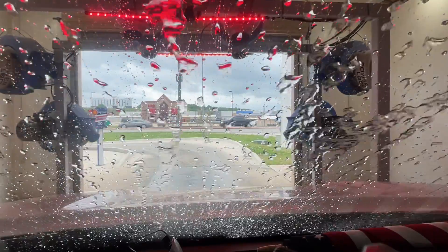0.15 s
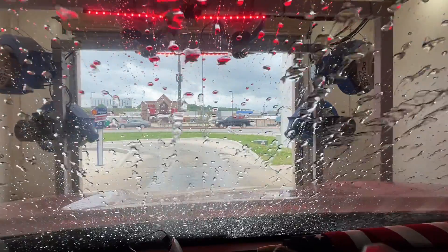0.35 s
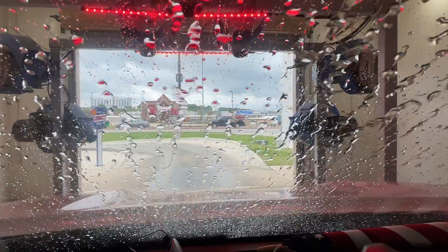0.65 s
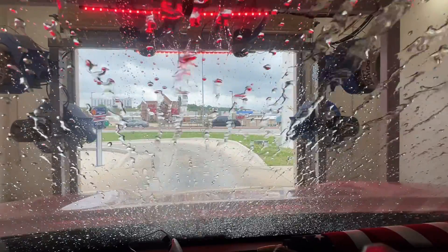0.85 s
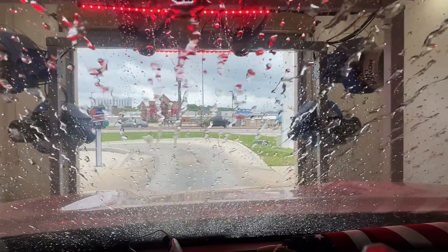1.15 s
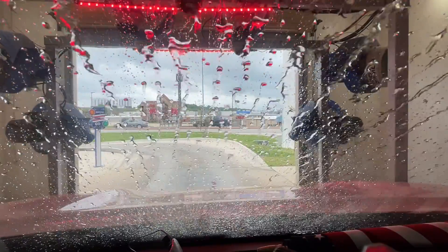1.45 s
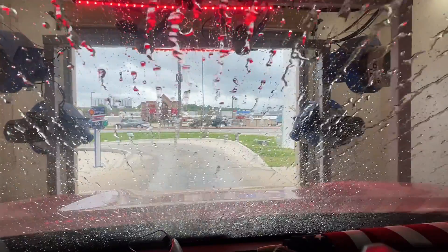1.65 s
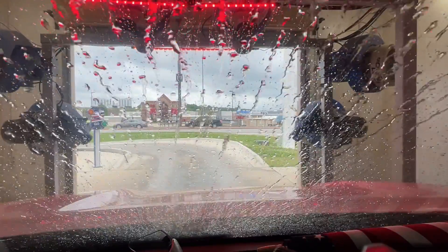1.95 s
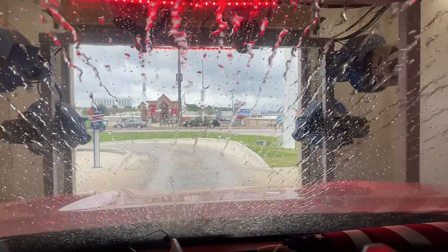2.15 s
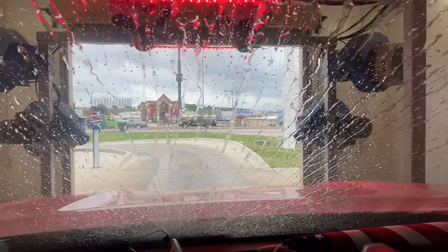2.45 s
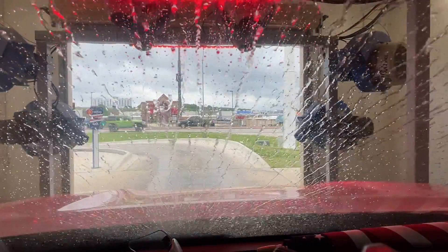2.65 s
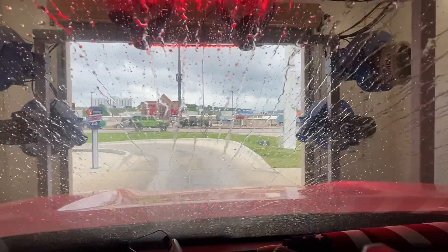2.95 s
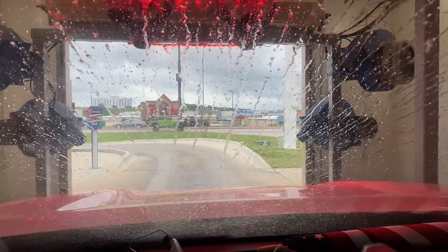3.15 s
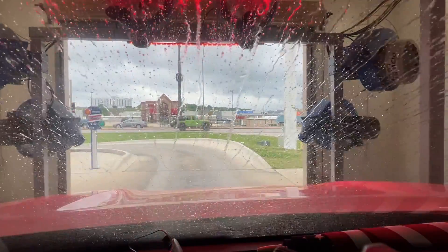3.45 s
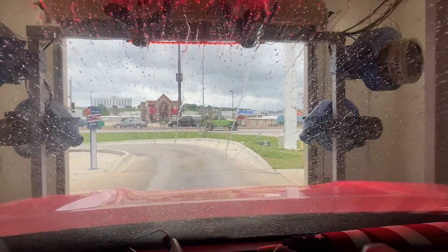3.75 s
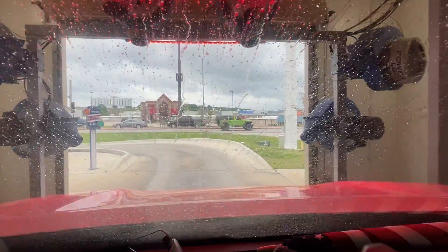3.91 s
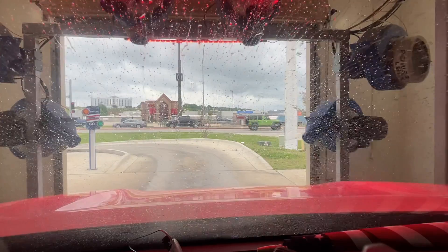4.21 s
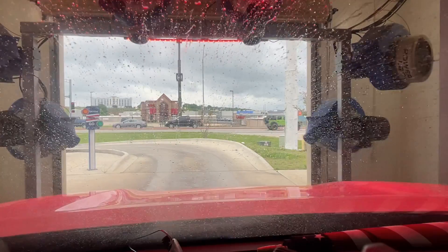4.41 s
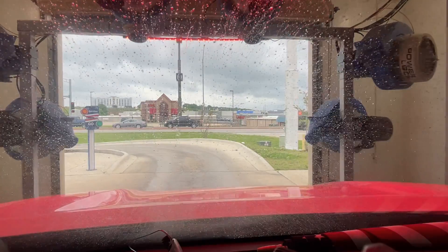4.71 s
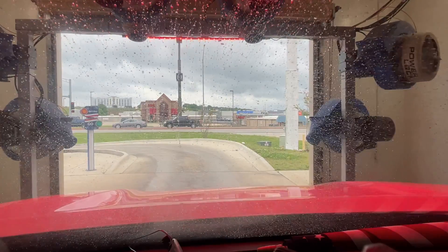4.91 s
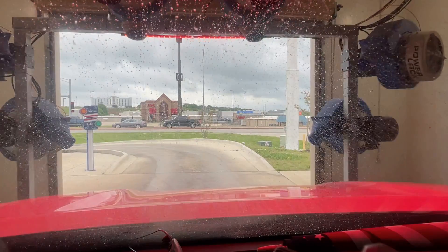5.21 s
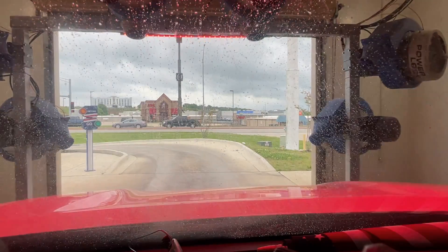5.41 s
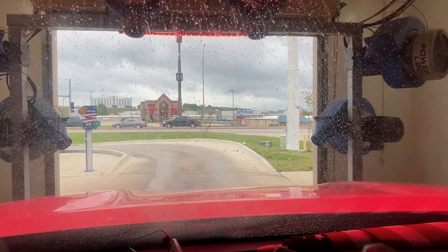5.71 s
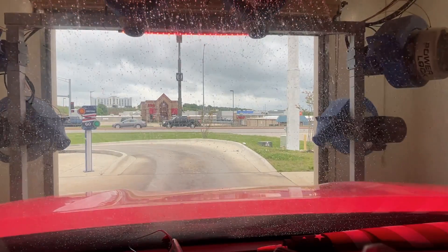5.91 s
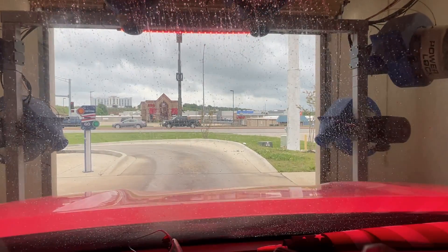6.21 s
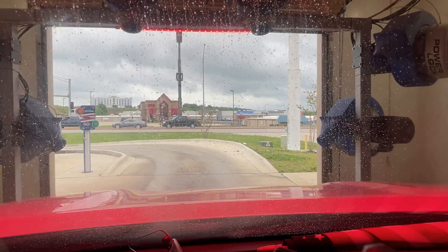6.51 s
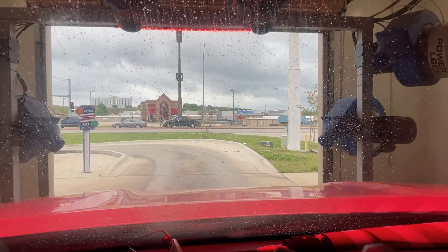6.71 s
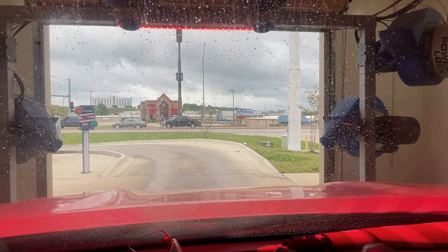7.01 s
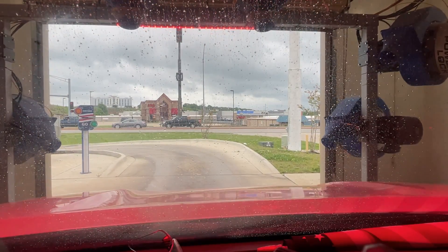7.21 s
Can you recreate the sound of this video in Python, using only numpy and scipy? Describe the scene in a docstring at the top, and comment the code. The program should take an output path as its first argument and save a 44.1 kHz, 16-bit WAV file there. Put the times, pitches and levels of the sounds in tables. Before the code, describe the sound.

From inside a truck cab, powerful blower jets boom and roar steadily, panels drumming, with water drops pattering on the windscreen and a heavy flurry midway.

```python
"""The deep boom of air jets on a truck's body, heard throughout from the cabin as it rolls through car-wash dryers.
Filtered noise makes the throb, drumming panels, roar and windscreen hiss; wavering sines make the fan whine.
Blown water patters as short noise bursts ringing the glass, with a heavy flurry as the last nozzles pass
overhead. Late on, a piece of plastic trim gives a tiny click."""
import sys
import numpy as np
from scipy import signal
from scipy.fft import rfft, irfft, next_fast_len
from scipy.io import wavfile
from scipy.ndimage import uniform_filter1d, minimum_filter1d, map_coordinates

SR = 44100
rng = np.random.default_rng(int(sys.argv[2]) if len(sys.argv) > 2 else 0)


def int16_out(signal):
    """Quantize to a 16-bit WAV file."""
    q = np.round(np.clip(np.atleast_2d(signal).T, -1, 1) * 32767)
    wavfile.write(sys.argv[1], SR, q.astype(np.int16))


N = 324576

# Strength of the air jets on the truck, greatest under the last nozzles: t/s, strength/dB
JET_STRENGTH = [(0, -5.5), (1.1, -3), (2.4, -0.1), (3.4, 0), (4.35, 3), (5.0, -0.5), (6.0, -1.3),
                (7.36, 0.85)]
# As the jets work back from bonnet to cab, some sounds gain or lose steadily about this time
MIDWAY_S = 3.9

# Cabin and panel resonances: f/Hz, width/Hz, lift/dB
CABIN_MODES = [(151, 13, 3.5), (188.5, 30, 8.5), (266, 31, 7.5), (379, 38, 1), (471, 70, 4), (527, 15, 6.5),
               (1050, 9, 3.5), (1215, 92, 6), (1418, 170, 4.5), (2550, 90, 0)]
# Likeness of the two ears of the stereo picture: f/Hz, likeness/0-1
EAR_LIKENESS = [(55, .98), (120, .8), (190, .76), (235, .1), (300, .15), (360, .72), (600, .25), (2000, .1),
                (8000, .2)]
# Balance of the air between the ears: f/Hz, left minus right/dB
EAR_BALANCE = [(75, -1.2), (112, 3.2), (170, 0), (203, -4.5), (250, 3.5), (375, 8), (470, 5), (1200, 2),
               (4000, 4.5), (6500, 0)]
LEFT_LEAD_S = .00043

# Colours of the air layers, each levelled later: f/Hz, relative level/dB
THROB_COLOUR = [(15, -33), (42, -16), (50, -2.5), (55, 5.5), (61, 2.5), (70, -22), (140, -85)]
BOOM_COLOUR = [(15, -32), (48, -19), (62, -7), (72, 0), (105, 0.5), (135, -2), (160, -14), (400, -85)]
LOWER_PANEL_COLOUR = [(80, -54), (135, -8.5), (170, -5), (203, 0.5), (222, -6.5), (250, -25), (500, -80)]
UPPER_PANEL_COLOUR = [(130, -67), (215, -3.5), (245, -1.5), (280, -3.5), (320, -14), (700, -74)]
ROAR_COLOUR = [(120, -52), (260, -6.5), (330, 1.5), (450, 0.5), (520, -4.5), (620, -7.5), (800, -21),
               (4000, -84)]
NOZZLE_COLOUR = [(250, -34), (480, -6.5), (610, 1), (740, 1), (880, -2.5), (1050, -13.5), (1400, -26.5),
                 (6000, -77.5)]
HISS_COLOUR = [(500, -22), (1100, 1.5), (1800, 0.45), (2800, 0.5), (4100, -8), (4800, -10.5), (5600, -16),
               (6800, -28), (8000, -34.5), (10000, -38.5), (12000, -44), (14000, -59.5)]
FIZZ_COLOUR = [(1500, -23.5), (3800, -5.5), (5400, 2), (6800, -2), (8000, -13), (10000, -16), (12000, -22),
               (13200, -41)]

# Slow surges of the cabin's lowest air mode: t/s, half-length/s, lift/dB
SURGES = [(1.25, 0.6, 6.5), (2.5, .1, 3.5), (3.45, 0.7, 4), (5.35, 0.65, 6.5), (6.55, 0.17, 7.5),
          (7.1, 0.24, 9)]
THROB_DB = -25.5  # between surges
# Buffeting hump, which shifts as the jet moves over the body: t/s, f/Hz, lift/dB
BUFFET_HUMP = [(0, 96, -0.5), (1.2, 64.2, 5.5), (2.2, 81.6, 11.5), (3.45, 74, 8), (4.0, 94.6, 8),
               (4.75, 88.5, 8), (5.101, 71, 7), (5.501, 107, 11.5), (5.8, 100, 13.5), (6.251, 107.8, 9),
               (7.36, 100, 5.5)]
# Buffeting, building until the jets reach the windscreen: t/s, level/dB
BUFFET_LEVEL = [(0, -20), (1.7, -17.5), (2.7, -16.5), (3.8, -12.5), (5.0, -15.5), (7.36, -15.5)]
# Flapping of the jets, heard as regular gusts in the lows: t/s, half-length/s, depth/dB
FLAPPING = [(5.9, 1.3, 0.5)]
FLAP_CREST_S, FLAP_PERIOD_S = 5.49, .362

# Jets crossing the lower panel and setting it drumming: t/s, half-length/s, lift/dB
LOWER_PASSES = [(1.15, 0.19, 3.5), (1.95, 0.24, 6), (2.35, 0.12, 5), (2.85, .2, 3), (3.3, 0.051, 5),
                (3.97, .13, 6), (4.27, 0.099, 5), (4.59, .1, 9), (6.5, 0.13, 3), (7.15, .15, 5)]
# Jets crossing the higher panel: t/s, half-length/s, lift/dB
UPPER_PASSES = [(.72, 0.045, 5.5), (1.75, 0.27, 4), (2.3, 0.11, 5.5), (3.55, 0.092, 4), (4.25, 0.55, 3)]
LOWER_DB, UPPER_DB = -23, -26.5  # between passes

# Gusts as a jet strikes the cab squarely, and a lull between jets: t/s, half-length/s, lift/dB
GUSTS = [(4.03, .14, 0.5), (4.42, 0.11, 4.5), (5.5, 0.41, -0.9), (6.75, 0.22, 2)]
# A nozzle passing close by: t/s, half-length/s, lift/dB
NOZZLE_PASSES = [(2.55, 0.75, 2)]
# Jets sweeping the windscreen, raising the bright hiss: t/s, half-length/s, lift/dB
SWEEPS = [(2.6, 0.5, 1), (5.15, 0.4, 0.8)]
# Levels before passes and gusts, at jet strength 0 dB and mid-way; growth is dB per dB of jet strength
ROAR_DB, ROAR_GROWS, ROAR_DB_PER_S = -24.5, 0.56, 0.38
NOZZLE_DB, NOZZLE_GROWS, NOZZLE_DB_PER_S = -29.5, 1.12, -0.28
HISS_DB, HISS_GROWS = -37.5, 1.1
FIZZ_DB, FIZZ_DB_PER_S = -59.5, 1
ECHO_S, ECHO_GAIN = .018, .09  # latest echo inside the cab; strength of each

# Fan blade tones: f/Hz, left minus right/dB, distant level/dB, nearest t/s, lift when nearest/dB
FANS = [(583, 10, -41, 3.9, 10.5), (715.5, 4, -47, 3.75, 6.5), (717, 4, -50, 6.9, 13),
        (462, 5, -43, 6.7, 9)]
APPROACH_S, RECEDE_S = 0.42, 0.67  # a fan comes into earshot faster than it leaves
WHINE_GROWS = 0.76  # dB per dB of jet strength

# Heaviest drops slapping the windscreen, before panning: t/s, peak level/dB
DROPS = [(0.0176, -23), (0.082, -30), (0.1131, -30.5), (.1456, -29.5), (0.159, -27), (.175, -27),
         (0.2215, -27.5), (0.273, -29.5), (0.52, -28), (1.033, -29), (1.3008, -26.5), (4.0, -22),
         (4.016, -23.5), (4.1509, -17.5), (4.165, -19.5), (4.2104, -21.5), (4.249, -18), (4.26, -21),
         (4.2825, -22.5), (4.3577, -23), (4.382, -20.5), (4.3968, -17), (4.4148, -20), (4.4428, -20.5),
         (4.459, -23), (4.4765, -19.5), (4.5002, -19.5), (4.514, -23), (4.692, -20.5), (4.7335, -24),
         (4.793, -23.5), (7.19, -23)]
# Small hard drops ticking on the roof, before panning: t/s, peak level/dB
TICKS = [(3.1214, -24), (3.2266, -20), (3.243, -22), (3.39, -25), (3.4877, -25), (3.949, -25.5),
         (4.0318, -23.5), (4.044, -23), (4.8058, -27)]
# Colour of the spreading water's ring on the glass: f/Hz, relative level/dB
SPLAT_COLOUR = [(500, -30.5), (1450, -1), (1950, 8.5), (2850, 10), (3400, -2), (4300, -12), (5400, -6),
                (6500, -24.5), (8500, -30.5), (15500, -48)]
# Colour of a drop's first contact: f/Hz, relative level/dB
SNAP_COLOUR = [(800, -11.5), (2500, 6.5), (5500, 5), (8000, -19), (10300, -21.5), (11800, -7.5),
               (13000, -20), (15500, -22)]
# Colour of a small hard drop: f/Hz, relative level/dB
TICK_COLOUR = [(1000, -26.5), (2400, 2.5), (3100, 8.5), (3800, -1), (5200, -14.5), (12000, -55)]
# Water from the nozzles, slightly thinned at first, then a flurry: t/s, half-length/s, lift/dB
FLURRIES = [(.1, 0.38, -0.5), (4.4, .42, 4.5)]
SPRAY_DB, SPRAY_GROWS = -48, 0.52  # between flurries; dB per dB of jet strength
DROPLETS_PER_S, DROPLET_SCATTER_DB = 80, 6  # on each of four patches of glass
SPATTER_PER_S, SPATTER_DB = 50, 9.5  # middling drops at the flurry's height; their peak over the spray
SNAP_DB, SNAP_SCATTER_DB = -17, 3  # first contact against its ring; some land harder than others

# Colour of the trim click: f/Hz, relative level/dB
TRIM_COLOUR = [(3000, -15), (5800, 6), (8300, -15), (9800, 3.5), (11000, -19.5)]
TOP_HZ = 15800  # upper edge of the audible band


def amp(db):
    """Decibels to gain."""
    return 10 ** (np.asarray(db) / 20)


def unit(x):
    """Scale so that the average of the channels has rms 1."""
    return x / np.sqrt(np.mean(np.atleast_2d(x).mean(0) ** 2) + 1e-20)


def along(points, hz):
    """Read (Hz, value) points on a log-frequency axis."""
    f, v = np.transpose(points)
    return np.interp(np.log(hz + 1), np.log(f + 1), v)


def curve(rows):
    """Draw a (s, value) automation line, one value per sample."""
    s, value = np.transpose(rows)
    return np.interp(np.arange(N) / SR, s, value)


def swells(rows):
    """Sum bell-shaped changes (s, half-length s, lift dB), in dB per sample."""
    t = np.arange(N) / SR
    return sum(db * np.exp(-((t - s) / half) ** 2) for s, half, db in rows)


def travel():
    """Seconds before or after the jets are mid-way."""
    return np.arange(N) / SR - MIDWAY_S


def wobble(rate):
    """A smooth random curve with rate knots a second."""
    knots = rng.standard_normal(int(N * rate / SR) + 4)
    return map_coordinates(knots, [np.arange(N) * rate / SR])


def filtered(x, response):
    """Filter x by a complex response of frequency."""
    size = next_fast_len(N + 8192)
    return irfft(rfft(x, size) * response(np.fft.rfftfreq(size, 1 / SR)), size)[..., :N]


def pan(left_db):
    """Left and right gains for a left-minus-right balance in dB."""
    return amp(np.array([np.atleast_1d(left_db), -np.atleast_1d(left_db)]) / 2)


def add(track, s, sound):
    """Mix a sound into the track at time s."""
    part = track[:, round(s * SR):][:, :sound.shape[1]]
    part += sound[:, :part.shape[1]]


def cabin(hz):
    """Gain of the cabin's resonant peaks."""
    lifts = [db / (1 + (2 * (hz - centre) / width) ** 2) for centre, width, db in CABIN_MODES]
    return amp(sum(lifts))


def rush(spectrum, patchy_db):
    """Turbulent air in the cabin: stereo noise with drifting patches, reaching the left ear first."""
    z = signal.stft(rng.standard_normal((2, N)), nperseg=512)[2]
    field = uniform_filter1d(rng.standard_normal(z.shape[1:]), size=6, axis=0)
    field = uniform_filter1d(field, size=14, axis=1, mode="wrap")
    patchy = z * amp(patchy_db * field / field.std())
    pair = signal.istft(patchy, nperseg=512)[1][:, :N]

    def mid_side(hz):
        turn = np.arccos(np.clip(along(EAR_LIKENESS, hz), 0, 1)) / 2
        return amp(along(spectrum, hz)) * cabin(hz) * [np.cos(turn), np.sin(turn)]

    def ears(hz):
        lead = np.exp(1j * np.pi * LEFT_LEAD_S * np.outer([1, -1], hz))
        return pan(along(EAR_BALANCE, hz)) * lead

    mid, side = filtered(pair, mid_side)
    return unit(filtered(np.array([mid + side, mid - side]), ears))


def steadied(x, seconds):
    """Even out the slow swells of a noise, as under a constant jet."""
    power = np.abs(uniform_filter1d(x.mean(0) ** 2, size=max(int(seconds * SR), 2)))
    return unit(x / np.sqrt(power + .05))


def buffeting(octaves):
    """Low turbulence with a hump that follows the jet over the body."""
    hz, t, z = signal.stft(rush(BOOM_COLOUR, patchy_db=.5), SR, nperseg=4096)
    s, *columns = np.transpose(BUFFET_HUMP)
    centre_hz, lift_db = [np.interp(t, s, column) for column in columns]
    away = np.log2((hz[:, None] + 1) / centre_hz) / octaves
    return signal.istft(z * amp(lift_db * np.exp(-away ** 2)), SR, nperseg=4096)[1][:, :N]


def low_air():
    """Jets pump the cabin's lowest air mode and buffet the body; flapping makes both come in gusts."""
    t = np.arange(N) / SR
    flap = amp(swells(FLAPPING) * np.cos(2 * np.pi * (t - FLAP_CREST_S) / FLAP_PERIOD_S))
    throb = amp(THROB_DB + swells(SURGES)) * steadied(rush(THROB_COLOUR, patchy_db=0.5), seconds=0.19)
    boom = amp(curve(BUFFET_LEVEL)) * steadied(buffeting(octaves=0.11), seconds=0.18)
    return flap * (throb + boom)


def panels():
    """Two body panels drum in their own bands, louder as each jet crosses them."""
    lower = steadied(rush(LOWER_PANEL_COLOUR, patchy_db=0.44), seconds=0.18)
    upper = steadied(rush(UPPER_PANEL_COLOUR, patchy_db=1.0), seconds=0.2)
    return amp(LOWER_DB + swells(LOWER_PASSES)) * lower + amp(UPPER_DB + swells(UPPER_PASSES)) * upper


def roar():
    """Broad turbulent roar that grows with the jets and gusts as they strike the cab."""
    level_db = ROAR_DB + ROAR_GROWS * curve(JET_STRENGTH) + ROAR_DB_PER_S * travel() + swells(GUSTS)
    return amp(level_db) * steadied(rush(ROAR_COLOUR, patchy_db=1.0), seconds=0.27)


def nozzles():
    """Patchy mid-band blowing from the nozzles, swelling as one passes close by."""
    level_db = NOZZLE_DB + NOZZLE_GROWS * curve(JET_STRENGTH) + NOZZLE_DB_PER_S * travel()
    return amp(level_db + swells(NOZZLE_PASSES)) * rush(NOZZLE_COLOUR, patchy_db=1.9)


def reflected(x, count):
    """Weak echoes off glass and dashboard comb the sound, differently at each ear."""
    delays = rng.uniform(0, ECHO_S, (count, 2, 1))
    echoes = lambda hz: 1 + ECHO_GAIN * sum(np.exp(-2j * np.pi * hz * delay) for delay in delays)
    return filtered(x, echoes) / np.sqrt(1 + count * ECHO_GAIN ** 2)


def hiss():
    """Air tears over the windscreen as bright noise, echoed within the cab."""
    level_db = HISS_DB + HISS_GROWS * curve(JET_STRENGTH) + swells(SWEEPS)
    return reflected(amp(level_db) * rush(HISS_COLOUR, patchy_db=0.7), count=8)


def fizz():
    """A faint, patchy top-end air noise that gains steadily."""
    return amp(FIZZ_DB + FIZZ_DB_PER_S * travel()) * rush(FIZZ_COLOUR, patchy_db=2.2)


def fans():
    """Blade tones nearly hold pitch and swell in passing; turbulence flutters each ear differently."""
    t = np.arange(N) / SR
    jet_db = curve(JET_STRENGTH)
    out = np.zeros((2, N))
    for hz, left_db, far_db, nearest_s, lift_db in FANS:
        near = np.exp(-((t - nearest_s) / np.where(t < nearest_s, APPROACH_S, RECEDE_S)) ** 2)
        whine_db = far_db + lift_db * near + WHINE_GROWS * jet_db
        phase = 2 * np.pi * np.cumsum(hz * (1 + 0.005 * wobble(10))) / SR
        ears = []
        for _ in range(2):
            flutter = amp(3 * wobble(18) + 1.5 * wobble(4))
            ears.append(flutter * np.sin(phase + 0.55 * wobble(30)))
        out += pan(left_db) * amp(whine_db) * unit(np.array(ears))
    return out


def impact(spectrum, t60, tail_db, tail_t60):
    """A short burst in the struck surface's colour, then the cabin's quick answer; peak near 1."""
    t = np.maximum(np.arange(4096) - 16, 0) / SR  # 16 samples of lead-in
    hz = np.fft.rfftfreq(len(t), 1 / SR)
    attack = 1 - np.exp(-t / 0.00015)
    envelope = (amp(-60 * t / t60) + amp(tail_db - 60 * t / tail_t60)) * attack
    burst = rfft(rng.standard_normal((2, len(t))) * envelope)
    # flatten the burst's own spectrum before colouring it
    even = burst / np.sqrt(uniform_filter1d(np.abs(burst) ** 2, size=70))
    hit = irfft(even * amp(along(spectrum, hz))) * (1 - t / t[-1])
    return hit / np.sqrt(6 * np.mean(hit.mean(0)[:200] ** 2))


def slap():
    """One drop: the first contact snaps brightly, then the spreading water rings the glass."""
    snap_db = SNAP_DB + SNAP_SCATTER_DB * rng.uniform(-1, 1)
    snap = amp(snap_db) * impact(SNAP_COLOUR, t60=0.008, tail_db=-25.0, tail_t60=.03)
    return snap + impact(SPLAT_COLOUR, t60=0.021, tail_db=-15, tail_t60=0.075)


def spray():
    """Random droplets patter on four patches of glass, each ringing in its own way."""
    size = amp(DROPLET_SCATTER_DB * rng.standard_normal((4, N)).clip(-2, 2))
    droplets = (rng.random((4, N)) < DROPLETS_PER_S / SR) * size
    patter = np.zeros((2, N))
    for patch in droplets:
        ring = impact(SPLAT_COLOUR, t60=0.019, tail_db=-14.5, tail_t60=0.066)
        patter += signal.fftconvolve(patch[None], ring, axes=1)[:, :N]
    return unit(patter)


def water():
    """Heavy drops slap, small ones tick, spray patters between; middling drops thicken the flurry."""
    hits = np.zeros((2, N))
    for s, db in DROPS:
        add(hits, s, amp(db) * slap())
    for s, db in TICKS:
        add(hits, s, amp(db) * impact(TICK_COLOUR, t60=0.022, tail_db=-16.5, tail_t60=0.16))
    flurry_db = swells(FLURRIES)
    spray_db = SPRAY_DB + SPRAY_GROWS * curve(JET_STRENGTH) + flurry_db
    chance = SPATTER_PER_S / SR * flurry_db / flurry_db.max()
    for i in np.flatnonzero(rng.random(N) < chance):
        add(hits, i / SR, amp(spray_db[i] + SPATTER_DB) * slap())
    return pan(4.8) * (hits + amp(spray_db) * spray())


def trim_click(s, db):
    """A tiny bright noise burst, the click of plastic trim."""
    out = np.zeros((2, N))
    add(out, s, amp(db) * impact(TRIM_COLOUR, t60=.025, tail_db=-22.5, tail_t60=.05))
    return out


def scene():
    """Air, fans, water and trim as heard behind the windscreen."""
    air = low_air() + panels() + roar() + nozzles() + hiss() + fizz()
    return air + fans() + water() + trim_click(s=6.005, db=-39.5)


def record(dry):
    """A limiter ducks both channels at crests above .92; then everything above the band is cut."""
    needed = np.minimum(1, .92 / (np.abs(dry).max(0) + 1e-9))
    gain = uniform_filter1d(minimum_filter1d(needed, size=441), size=441)  # 10 ms windows
    return filtered(dry * gain, lambda hz: hz < TOP_HZ)


dry = scene()
out = record(dry)
int16_out(out)
```